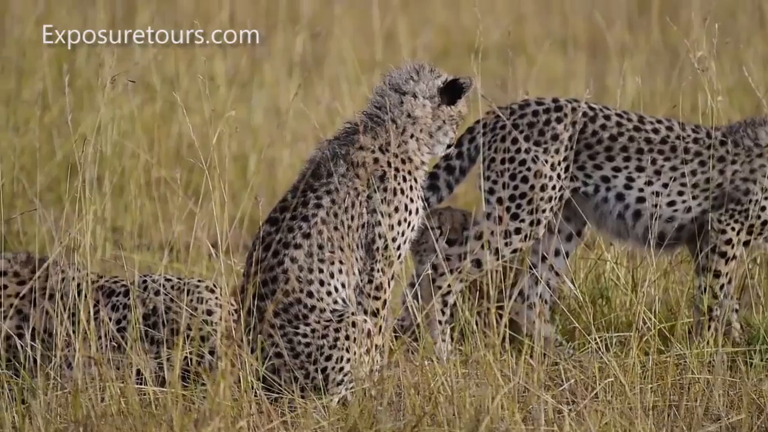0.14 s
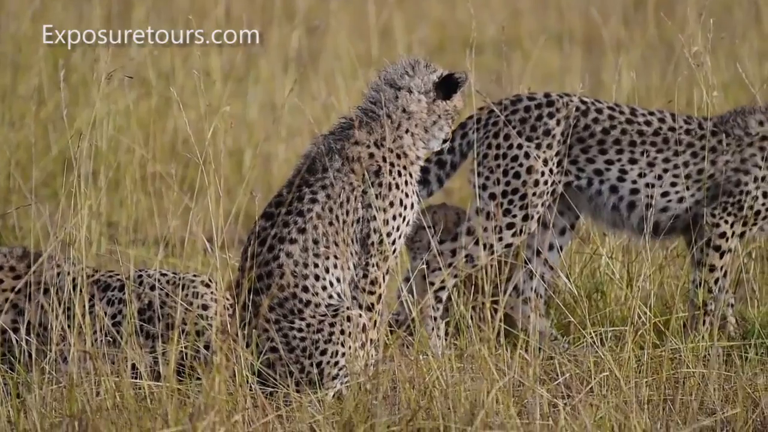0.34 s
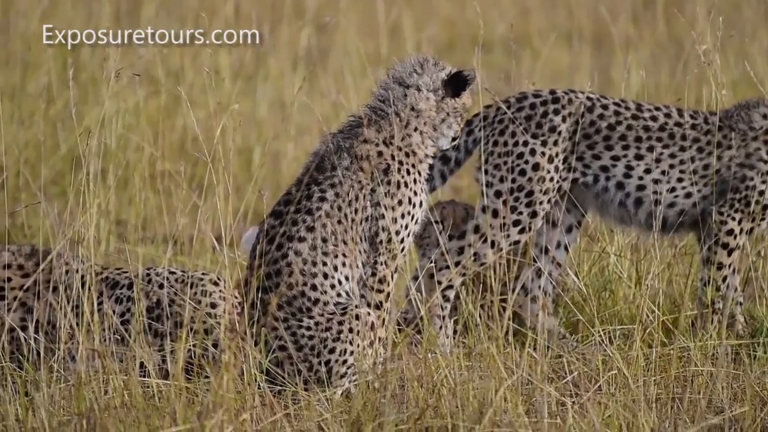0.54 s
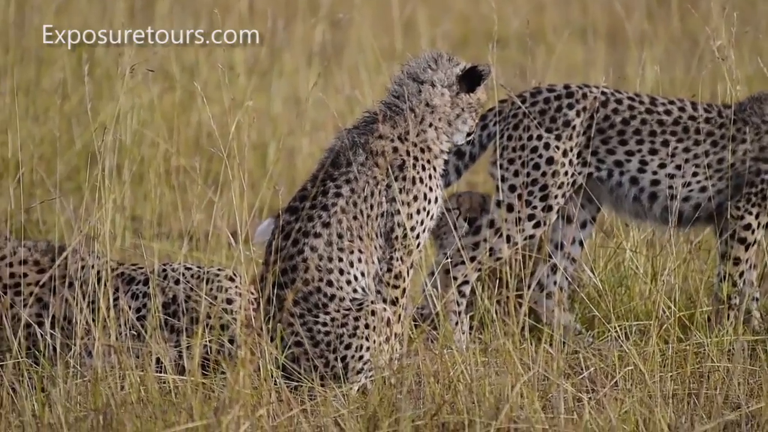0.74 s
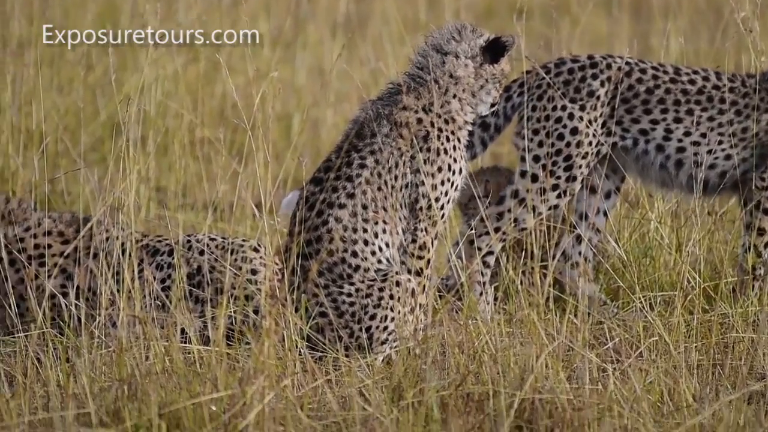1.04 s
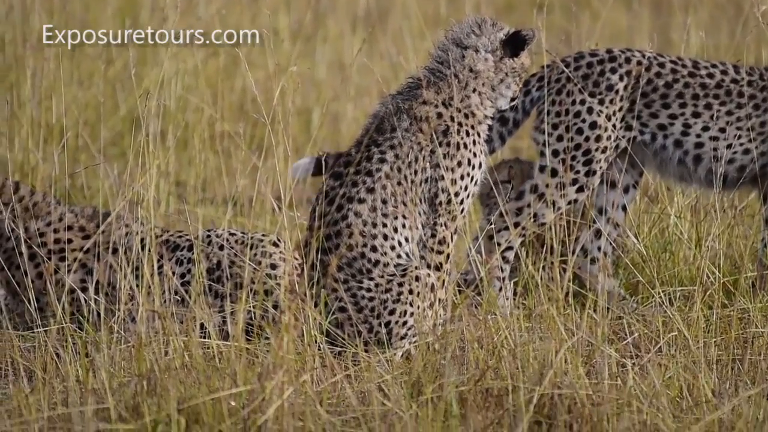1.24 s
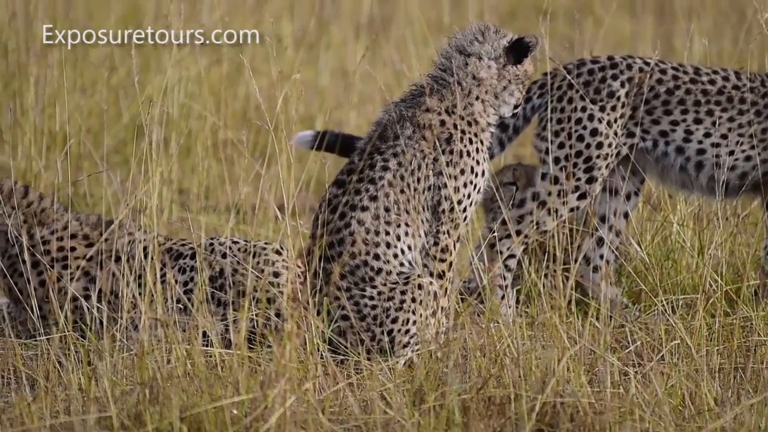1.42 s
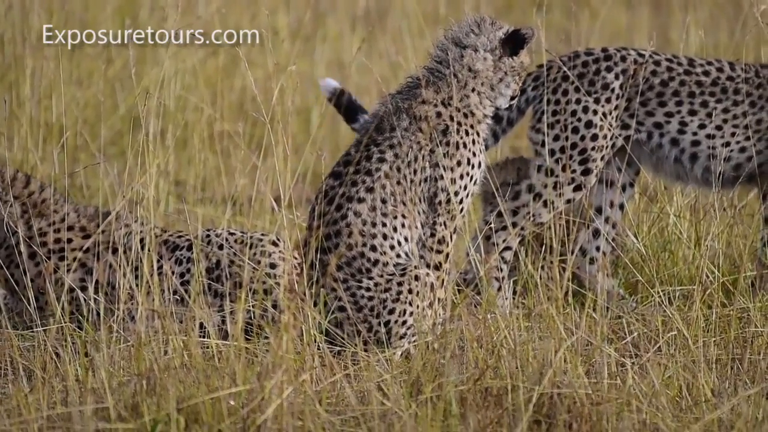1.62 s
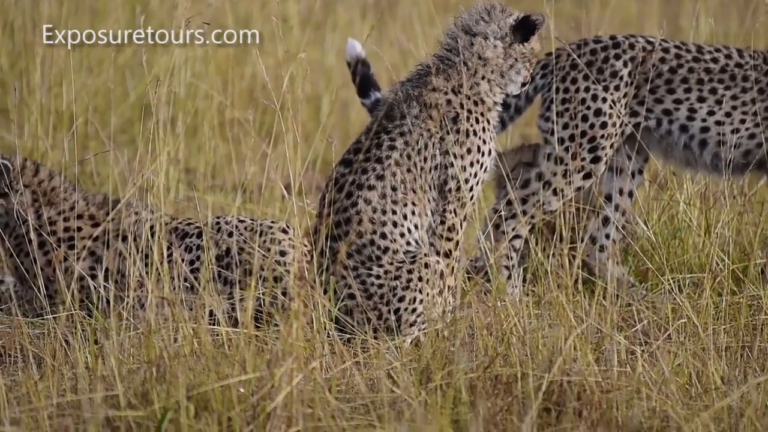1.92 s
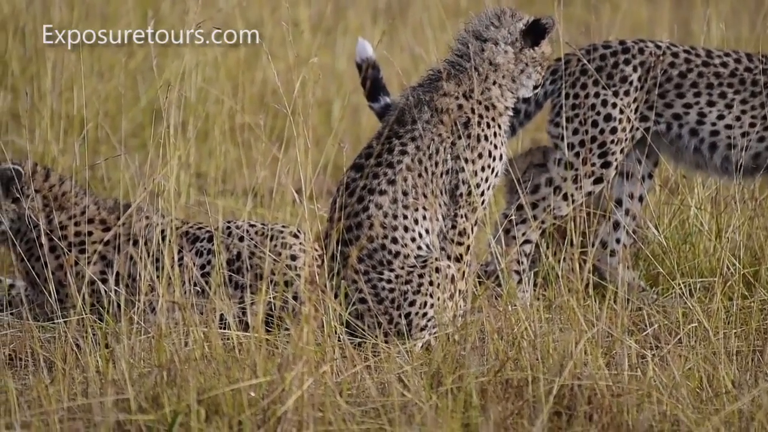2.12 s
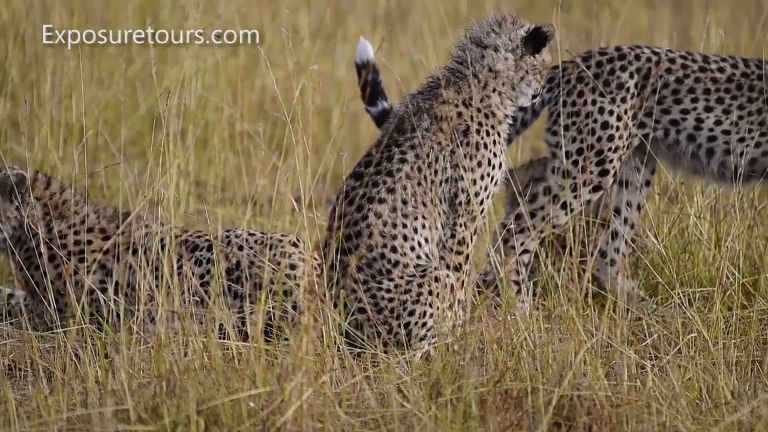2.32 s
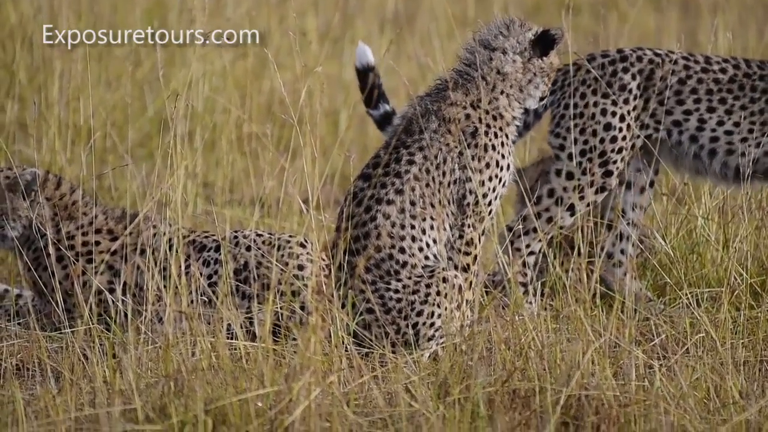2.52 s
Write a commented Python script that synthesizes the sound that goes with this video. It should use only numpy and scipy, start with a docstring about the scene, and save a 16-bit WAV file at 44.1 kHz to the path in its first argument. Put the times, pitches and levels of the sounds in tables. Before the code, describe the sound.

Small birds call left of centre in open grassland. A gliding note and three sharp, dry buzzes fill the first 0.4 seconds. Four thin slurred whistles follow from 0.5 to 1.2, with low trills near 0.8 and 1.0. A brief gust touches the microphone at 1.0; grass rustles strongest around 1.35, amid small ticks. Quick warbling chips and swoops run from 1.55 to the end over faint rumble and hiss.

```python
"""Small birds call in open dry grassland, mostly to the left, over a faint low rumble, hiss and steady tones.
First come one gliding note and three sharp buzzes (trains of fast upward sweeps), with two weak ones between.
Four slurred thin whistles follow (gliding near-sines), with two low trills (fluttering pitch) among them.
Meanwhile a light gust touches the microphone and a soft rustle swells (banded noise); ticks are resonant
bursts. A quick warble of fluttering glides and short chips ends the scene; the rustle swells again beneath it."""
import sys
import numpy as np
from scipy import signal
from scipy.fft import rfft, irfft
from scipy.io import wavfile

SR = 44100
rng = np.random.default_rng(int(sys.argv[2]) if len(sys.argv) > 2 else 0)


def store_pcm(level_fs):
    """Save levels as 16-bit WAV."""
    pcm = np.round(np.clip(level_fs, -1, 1) * 32767).astype(np.int16)
    wavfile.write(sys.argv[1], SR, np.atleast_2d(pcm).T)


N = 117306
T = np.arange(N) / SR  # time axis, s

# Spectrum of the steady rumble and hiss: (frequency [Hz], relative level [dB])
AIR_SPECTRUM = [(20, -18), (50, -6.5), (68, -12.5), (88, -1.5), (120, -2), (180, -3.5), (245, -13.5),
                (450, -15.5), (1400, -21), (3500, -20.5), (7500, -19), (10000, -23.5), (13000, -31.5),
                (15500, -42)]
# Likeness of left and right noise: (frequency [Hz], likeness [0-1])
NOISE_LIKENESS = [(30, 0.92), (170, 0.86), (350, 0.42), (1000, 0.42), (3000, 0), (12000, 0.19)]
# Steady low drone and two thin whines: (frequency [Hz], level [dB], spread of the frequency drift [Hz])
STEADY_TONES = [(87.25, -65, 4), (8354, -72, 3), (15734, -76, 1)]
# Course of the gust on the microphone: (time [s], level [dB])
GUST_LEVEL = [(.9, -77), (.965, -54.5), (.995, -50.5), (1.05, -58), (1.12, -65), (1.19, -61), (1.26, -76)]
# Spectrum of the gust: (frequency [Hz], relative level [dB])
GUST_SPECTRUM = [(20, -15), (36, 0.5), (65, -20.5), (170, -8), (300, -31), (900, -26)]
# Course of the rustle: (time [s], level [dB])
RUSTLE_LEVEL = [(0, -57.5), (.75, -75.5), (1.0, -59), (1.15, -63.5), (1.25, -57.5), (1.31, -51),
                (1.39, -51), (1.48, -56), (1.57, -62.5), (1.8, -64.5), (1.95, -57.5), (2.1, -72),
                (2.66, -91)]
# Spectrum of the rustle: (frequency [Hz], relative level [dB])
RUSTLE_SPECTRUM = [(180, -40), (300, 1), (372, -20), (404, -5), (571, -9.5), (1940, -3.5), (3180, -14),
                   (4420, -6), (9450, -9), (15500, -17.5)]
# Dry ticks and soft knocks: (time [s], level [dB], centre [Hz], bandwidth [Hz], time to fall 30 dB [s])
DRY_TICKS = [(.374, -47, 1800, 448, 0.015), (0.787, -49, 2400, 1800, 0.013), (0.785, -45.5, 780, 590, .025),
             (.859, -52, 700, 900, 0.032), (.93, -53.5, 550, 400, 0.045), (1.258, -45, 150, 70, 0.068),
             (1.304, -47.5, 1090, 1780, 0.026), (1.802, -56, 1195, 3000, .015),
             (2.372, -56, 600, 700, 0.032), (2.381, -49.5, 10000, 3500, .018),
             (2.426, -56, 10500, 5000, .012), (1.797, -58, 11000, 4000, .04)]
# Buzzes: (time of the loudest moment [s], level [dB], top pitch [Hz], sweep rise [s], length factor [1])
BUZZ_CALLS = [(0.0203, -30.3, 8000, .0007, 1.05), (.2225, -45, 9300, .0005, 0.27),
              (.252, -30, 7650, .0005, 1.15), (.3505, -40, 9000, .0005, .15),
              (.381, -30.2, 7650, .0005, 1.05)]

# Note shapes: (time from the start [s], pitch [Hz], relative level [dB], flutter depth [Hz])
UPSLUR_SHAPE = [(0, 4290, -22, 60), (.007, 4530, -3.5, 60), (.012, 4630, -0.5, 60), (.019, 5350, -8, 60.3)]
WHISTLE_SHAPE = [(0, 4120, -13, 0), (.014, 4185, -1, 0), (.034, 4080, -1, 0), (.054, 4000, -3, 0),
                 (.078, 4050, -4, 0), (.09, 4070, -20, 0)]
FLAT_TRILL_SHAPE = [(0, 2400, -7, 250), (.006, 2280, -8, 200), (.018, 2860, -1, 290), (.05, 2890, 0, 300),
                    (.072, 2800, 2.5, 350), (.095, 2900, -10, 280)]
ARCHED_TRILL_SHAPE = [(0, 2330, -11, 200), (.012, 2900, 0, 270), (.028, 2970, -2, 300),
                      (.048, 3090, 1, 320), (.073, 2860, 2, 320), (.09, 2980, -3.5, 310),
                      (.103, 2750, -13, 250)]
SWOOP_SHAPE = [(0, 5250, -11, 50), (.009, 5150, 2, 90), (.026, 4500, -7, 250), (.037, 3550, -1, 40),
               (.05, 3200, 0, 20), (.056, 2900, -22, 20), (.068, 2835, 0, 30), (.081, 3000, -3, 70),
               (.093, 3750, 3, 70), (.099, 2500, -10, 50), (.107, 2030, -16, 50)]
DIP_SHAPE = [(0, 5050, -12, 20), (.014, 5000, 6, 110), (.024, 4700, -12, 170), (.04, 3700, -4, 60),
             (.056, 3350, -18, 60), (.068, 2990, -20, 60), (.084, 3450, -12, 60), (.094, 4160, -0.5, 290),
             (.108, 4340, -16, 100)]
BURR_SHAPE = [(0, 4300, -6, 60), (.018, 4364, 5, 380), (.034, 4100, -7, 350), (.045, 3400, -9, 80.5),
              (.056, 3250, -6, 60), (.066, 3096, -16, 59.5)]
DROOP_SHAPE = [(0, 3700, -5, 400), (.005, 3750, 4, 380), (.01, 2950, 0, 60), (.021, 2500, -2, 20),
               (.03, 2440, -9, 10), (.068, 2430, -4, 10), (.079, 2300, -12, 10)]
# Notes sung on each shape: (start time [s], level [dB], pitch factor [1], length factor [1])
UPSLUR_NOTES = [(.48, -48.5, 0.98, 0.97), (.664, -47.5, 0.99, 0.93), (.865, -52.5, 0.98, 1),
                (1.069, -56, 1, 1)]
WHISTLE_NOTES = [(.51, -45, .995, 0.99), (.698, -46.5, 1, 0.98), (.9, -48, 1.003, 1.01),
                 (1.104, -53, 1, 0.96)]
FLAT_TRILL_NOTES = [(.786, -44.5, 1, 1)]
ARCHED_TRILL_NOTES = [(.952, -46, 1, 1)]
SWOOP_NOTES = [(.007, -42.5, 0.97, 0.99), (2.219, -45.5, 1.01, 0.94), (2.42, -46, .99, 0.95),
               (2.634, -45, 1, 0.95)]
DIP_NOTES = [(1.572, -44.5, 0.99, 1), (1.774, -44.5, 0.99, 0.99)]
BURR_NOTES = [(1.971, -48, 1, 0.9), (2.176, -48, 0.98, 0.91), (2.379, -47, 1.01, 0.94),
              (2.597, -49, 0.98, 1)]
DROOP_NOTES = [(2.057, -49.5, 1, .98)]
# Short curved chips: (start time [s], length [s], first pitch [Hz], middle pitch [Hz], last pitch [Hz],
# level [dB], flutter depth [Hz])
CHIP_NOTES = [(.317, .031, 2950, 3050, 2050, -53.5, 30), (.469, .024, 3850, 3450, 3800, -52, 120),
              (.492, .032, 3700, 3350, 2550, -55, 70), (.683, .065, 6050, 5950, 5750, -56, 220),
              (.686, .03, 7600, 7550, 7450, -59, 300), (.805, .044, 7340, 7470, 7730, -59, 300),
              (.873, .022, 3150, 3220, 3150, -48, 70), (.896, .026, 3100, 3240, 2800, -47, 150),
              (1.205, .035, 5300, 5600, 6200, -54.5, 700), (1.679, .012, 3400, 2970, 2850, -50, 30),
              (1.688, .016, 3650, 3080, 2900, -46, 30), (1.704, .022, 3450, 3400, 2750, -45, 420),
              (1.713, .05, 10800, 11300, 12400, -56, 700), (1.725, .02, 2650, 2500, 2650, -48.5, 20),
              (1.734, .016, 4050, 3550, 3150, -54, 60), (1.751, .022, 3250, 3050, 2750, -52, 50),
              (1.817, .03, 7400, 7600, 7970, -59, 400), (1.89, .055, 6450, 6200, 5550, -48.5, 300),
              (2.072, .018, 3200, 3500, 3750, -49, 260), (2.141, .044, 3420, 3330, 2900, -52, 100),
              (2.148, .03, 3080, 2980, 2900, -55, 40), (2.282, .04, 3400, 3900, 3850, -52, 180),
              (2.424, .03, 3350, 3200, 3080, -47, 300)]

# Place of each singer: (left minus right [dB], lead of the left side [ms])
BUZZER_AT, WHISTLER_AT = (7.8, 0.135), (6.7, 0.012)
TRILLER_AT, WARBLER_AT = (7.8, 0.094), (8.03, 0.11)

AIR_DB, AIR_PAN_DB, AIR_FLICKER_DB = -55.5, 1.5, 1.52
HISS_TOP_HZ, CUTOFF_HZ = 14000, 15900
RUSTLE_GRAIN_DB, RUSTLE_PAN_DB = 2.5, 5.5

BUZZ_PULSES_PER_S, BUZZ_JITTER = 222, .008
BUZZ_LOW_HZ, BUZZ_LOW_CUT_HZ = 4100, 3800
BUZZ_SAG_HZ_PER_S, BUZZ_EARLY_HZ_PER_S = 60000, 35000
BUZZ_SWELL_S, BUZZ_FADE_S = .016, .018  # before the length factor

TRILL_FLUTTER_HZ, WARBLE_FLUTTER_HZ, FLUTTER_ROUGH = 308, 220, .07
FLUTTER_RASP = .12  # random share of the flutter swing
FLUTTER_THROB, THROB_LAG_RAD = .5, .7  # the lag makes each flutter loudest at high pitch
PITCH_WAVER, NOTE_FLICKER_DB, OVERTONE_DB = .004, 2.1, -26
NOTE_EDGE_S = .003

BUZZ_SCATTER_DB, TRILL_SCATTER_DB, SCATTER_T60_S = -8, -15, .055
BUSH_ECHO_DB, BUSH_T60_S = -9, .17
WHISTLE_ECHO_DB, FAR_ECHO_DB, FAR_T60_S = -13, -25, .7


def from_db(db):
    """Logarithmic level: 20 dB is a factor of ten in amplitude."""
    return 10 ** (np.asarray(db) / 20)


def rms_one(x):
    """Power normalisation: the mean square becomes one."""
    return x / np.sqrt(np.mean(x ** 2) + 1e-20)


def at_hz(points, hz):
    """Logarithmic frequency scale: a spectrum is read between its points."""
    f, v = np.transpose(points)
    return np.interp(np.log(hz), np.log(f), v)


def drift(rate_hz):
    """Low-pass random fluctuation: two equal poles smooth noise of unit spread."""
    pole = np.exp(-16 * np.pi * rate_hz / SR)  # computed at an eighth of the sample rate
    white = rng.standard_normal(N // 8 + 4002)
    slow = signal.lfilter([1], [1, -2 * pole, pole * pole], white)[4000:]  # drop the settling
    return np.interp(np.arange(N) / 8, np.arange(len(slow)), rms_one(slow))


def place(x, pan_db, lead_ms=0):
    """Interaural-style localisation: level and arrival time differ between the sides."""
    cycles_per_sample = np.arange(N + 1) / (2 * N)
    delay = np.exp(-2j * np.pi * cycles_per_sample * SR * lead_ms / 1000)
    right = irfft(rfft(x, 2 * N) * delay)[:N]
    return np.array([x * from_db(pan_db / 2), right * from_db(-pan_db / 2)])


def banded_noise(spectrum, flicker_db, pan_db):
    """Subtractive synthesis: half-octave bands of noise, each with its own level, flicker and stereo likeness."""
    out = 0
    edges = 19 * 2 ** np.arange(0, 10.1, .5)
    white = rng.standard_normal((2, 2, N))
    for k, (low, high) in enumerate(zip(edges, edges[1:])):
        hz = np.sqrt(low * high)
        if spectrum[0][0] / 2 < hz < spectrum[-1][0] * 2:
            band = signal.butter(3, [low, high], "band", fs=SR, output="sos")
            mid, side = signal.sosfilt(band, white[k % 2])  # neighbouring bands use different noise
            alike = np.clip(at_hz(NOISE_LIKENESS, hz), -1, 1)
            gain = from_db(at_hz(spectrum, hz) + flicker_db * drift(23))
            out = out + gain * (np.sqrt(1 + alike) * mid + np.sqrt(1 - alike) * side * [[1], [-1]])
    out = signal.sosfilt(signal.butter(10, HISS_TOP_HZ, fs=SR, output="sos"), out)
    return rms_one(out) * from_db([[pan_db / 2], [-pan_db / 2]])


def scatter(x, t60, count=90):
    """Multiple scattering: many small echoes, different on each side, decay exponentially."""
    echoes = np.zeros((2, SR))
    for side in echoes:
        delay = rng.uniform(.002, min(t60, .95), count)
        side[(delay * SR).astype(int)] = rng.choice([-1, 1], count) * from_db(-60 * delay / t60)
        side /= np.sqrt(np.sum(side ** 2))
    return signal.fftconvolve(x, echoes, axes=1)[:, :N]


def steady_tones():
    """Narrow-band oscillation: sines whose frequency and level drift slightly."""
    out = np.zeros(N)
    for hz, db, spread_hz in STEADY_TONES:
        phase = 2 * np.pi * np.cumsum(hz + spread_hz * drift(8.2)) / SR
        out += from_db(db) * rms_one(np.sin(phase) * from_db(1.5 * drift(6)))
    return out


def gust():
    """Flow noise at the microphone: mostly low-frequency noise under one level course."""
    level_db = np.interp(T, *np.transpose(GUST_LEVEL))
    return from_db(level_db) * banded_noise(GUST_SPECTRUM, 2.3, pan_db=-3)


def air():
    """Superposition of the background: broadband rumble and hiss, tones and the gust."""
    rumble_and_hiss = from_db(AIR_DB) * banded_noise(AIR_SPECTRUM, AIR_FLICKER_DB, AIR_PAN_DB)
    return rumble_and_hiss + steady_tones() + gust()


def rustle():
    """Granular noise: fast random grain modulates banded noise."""
    level_db = np.interp(T, *np.transpose(RUSTLE_LEVEL)) + RUSTLE_GRAIN_DB * drift(360)
    return from_db(level_db) * banded_noise(RUSTLE_SPECTRUM, 1.7, RUSTLE_PAN_DB)


def ticks():
    """Damped resonance: each dying burst of friction noise passes one resonator."""
    out = np.zeros(N)
    for s, db, hz, width_hz, fall_s in DRY_TICKS:
        pole = np.exp(-np.pi * width_hz / SR)
        feedback = [1, -2 * pole * np.cos(2 * np.pi * hz / SR), pole * pole]
        burst = rms_one(signal.lfilter([1, 0, -1], feedback, rng.standard_normal(N)))
        age = np.maximum(T - s, 0)
        onset = 1 - np.exp(-age * hz)
        out += burst * from_db(db - 30 * age / fall_s) * onset
    return place(out, pan_db=2.5)


def tone(hz):
    """Phase integration: a near-pure voice with a weak second harmonic follows a moving pitch."""
    phase = 2 * np.pi * np.cumsum(hz) / SR
    return np.sin(phase) + from_db(OVERTONE_DB) * np.sin(2 * phase) * (hz < SR / 4)


def sing(shape, notes, flutter_hz=WARBLE_FLUTTER_HZ, rough=FLUTTER_ROUGH):
    """Joint frequency and amplitude modulation: a fast flutter makes gliding notes burry."""
    s, hz, db, depth = np.transpose(shape)
    flutter = 2 * np.pi * np.cumsum(flutter_hz * (1 + rough * drift(148))) / SR
    waver = 1 + PITCH_WAVER * drift(68)
    flicker = NOTE_FLICKER_DB * drift(85)
    rasp = FLUTTER_RASP * drift(500)
    out = np.zeros(N)
    for start, level_db, pitch, length in notes:
        end = start + s[-1] * length
        on = (T > start - NOTE_EDGE_S) & (T < end + NOTE_EDGE_S)
        t = (T[on] - start) / length
        edge = np.clip(np.minimum(T[on] - start, end - T[on]) / NOTE_EDGE_S + 1, 0, 1)
        swing = np.interp(t, s, depth)
        throb_depth = FLUTTER_THROB * np.tanh(swing / flutter_hz)
        throb = 1 + throb_depth * np.cos(flutter[on] - THROB_LAG_RAD)
        glide = pitch * np.interp(t, s, hz) * waver[on]
        note_hz = glide + swing * (np.sin(flutter[on]) + rasp[on])
        gain = from_db(level_db + np.interp(t, s, db) + flicker[on])
        out[on] += edge * throb * gain * tone(note_hz)
    return out


def chips(edge_db=-8):
    """Parabolic glide: each chip swells and fades through its first, middle and last pitch."""
    out = np.zeros(N)
    along = np.linspace(-1, 1, 9)
    for start, length, first, middle, last, db, depth in CHIP_NOTES:
        bend = (first + last) / 2 - middle
        hz = middle + (last - first) / 2 * along + bend * along ** 2
        arc = np.transpose([(along + 1) / 2 * length, hz, edge_db * along ** 2, np.full_like(along, depth)])
        out += sing(arc, [(start, db, 1, 1)])
    return out


def buzzes(attack_s=.0002, ring_s=.0021, echo_s=.0026, echo_width_s=.0006, echo_db=-5.5,
           pitch_rough=.035, flicker_db=1.5):
    """Pulse-train modulation: each pulse sweeps up and dies, and a weaker ground echo follows; early pulses
    reach higher."""
    out = np.zeros(N)
    rough = 1 + pitch_rough * drift(913)
    flicker = flicker_db * drift(160)
    cycles = np.cumsum(BUZZ_PULSES_PER_S * (1 + BUZZ_JITTER * drift(60))) / SR
    for s, db, top_hz, rise_s, length in BUZZ_CALLS:
        turn = (cycles - np.interp(s, T, cycles) + .15) % 1  # position within the pulse
        age = turn / BUZZ_PULSES_PER_S
        top = top_hz + BUZZ_EARLY_HZ_PER_S * np.maximum(s - BUZZ_SWELL_S / 2 - T, 0)
        sweep = top - (top - BUZZ_LOW_HZ) * np.exp(-(age / rise_s) ** 1.9)
        hz = sweep - BUZZ_SAG_HZ_PER_S * age
        attack = 1 - np.exp(-(age / attack_s) ** 2)
        ring = np.exp(-(age / ring_s) ** 4)
        echo = from_db(echo_db) * np.exp(-((age - echo_s) / echo_width_s) ** 2)
        pulse = attack * (ring + echo) * (1 - turn ** 10)  # silent as the next pulse begins
        side_s = np.where(T < s, BUZZ_SWELL_S, BUZZ_FADE_S)
        swell = np.exp(-np.abs((T - s) / length / side_s) ** 2.4)
        out += from_db(db + flicker) * swell * pulse * np.sin(2 * np.pi * np.cumsum(hz * rough) / SR)
    return signal.sosfilt(signal.butter(4, BUZZ_LOW_CUT_HZ, "high", fs=SR, output="sos"), out)


def whistles():
    """Frequency glide: each upward slur leads into a thin, nearly level whistle."""
    return sing(UPSLUR_SHAPE, UPSLUR_NOTES) + sing(WHISTLE_SHAPE, WHISTLE_NOTES)


def trills():
    """Rapid frequency modulation: deep flutter turns two low notes into trills."""
    flat = sing(FLAT_TRILL_SHAPE, FLAT_TRILL_NOTES, TRILL_FLUTTER_HZ, rough=.03)
    arched = sing(ARCHED_TRILL_SHAPE, ARCHED_TRILL_NOTES, TRILL_FLUTTER_HZ, rough=.08)
    return flat + arched


def warbles():
    """Concatenated glides: swoops, dips, burrs, a droop and chips form the song."""
    swoops_and_dips = sing(SWOOP_SHAPE, SWOOP_NOTES) + sing(DIP_SHAPE, DIP_NOTES)
    burrs_and_droop = sing(BURR_SHAPE, BURR_NOTES) + sing(DROOP_SHAPE, DROOP_NOTES)
    return swoops_and_dips + burrs_and_droop + chips()


def birds():
    """Direct and scattered sound: singers in place, with echoes from grass, bushes and the far plain."""
    buzz = place(buzzes(), *BUZZER_AT)
    whistle = place(whistles(), *WHISTLER_AT)
    trill = place(trills(), *TRILLER_AT)
    warble = place(warbles(), *WARBLER_AT)
    near = scatter(from_db(BUZZ_SCATTER_DB) * buzz + from_db(TRILL_SCATTER_DB) * trill, SCATTER_T60_S)
    bushes = scatter(from_db(BUSH_ECHO_DB) * warble, BUSH_T60_S, count=40)
    to_plain = from_db(WHISTLE_ECHO_DB) * whistle + from_db(FAR_ECHO_DB) * (buzz + trill + warble)
    far = scatter(to_plain, FAR_T60_S, count=300)
    return buzz + trill + warble + whistle + near + bushes + far


def scene():
    """Linear superposition: air, rustle, ticks and birds add."""
    return air() + rustle() + ticks() + birds()


def record(dry):
    """Band limitation: a steep elliptic low-pass removes the top."""
    return signal.sosfilt(signal.ellip(12, .2, 80, CUTOFF_HZ, fs=SR, output="sos"), dry)


dry = scene()
out = record(dry)
store_pcm(out)
```